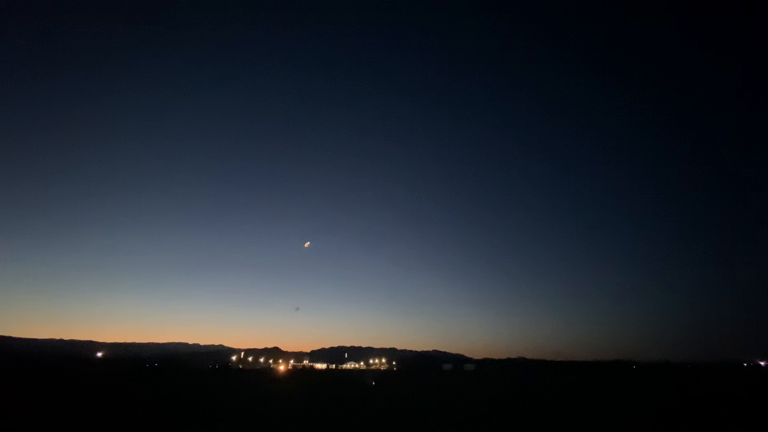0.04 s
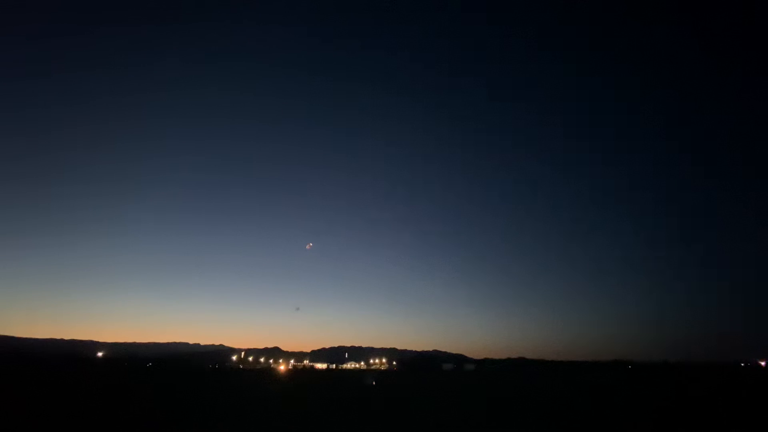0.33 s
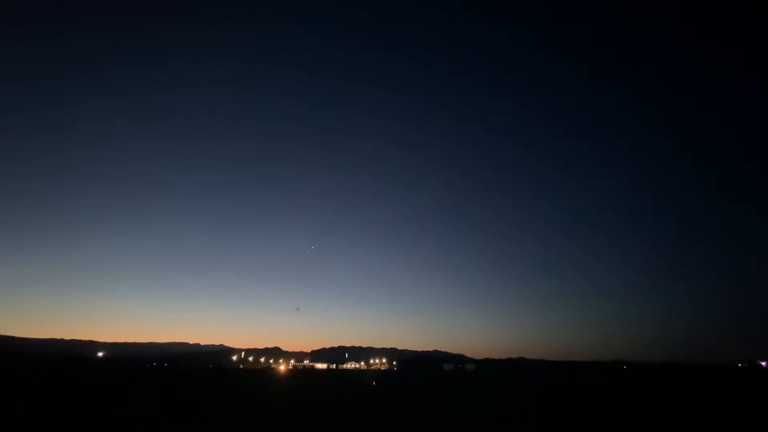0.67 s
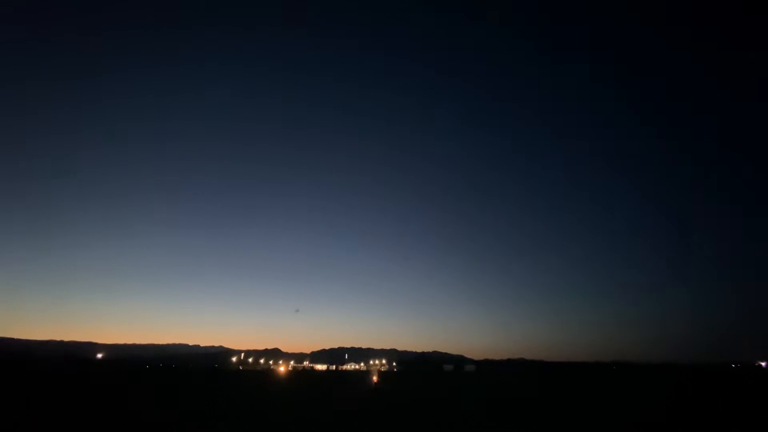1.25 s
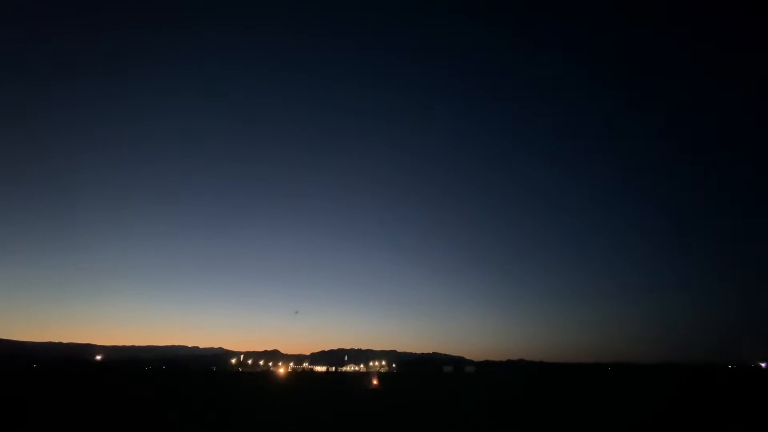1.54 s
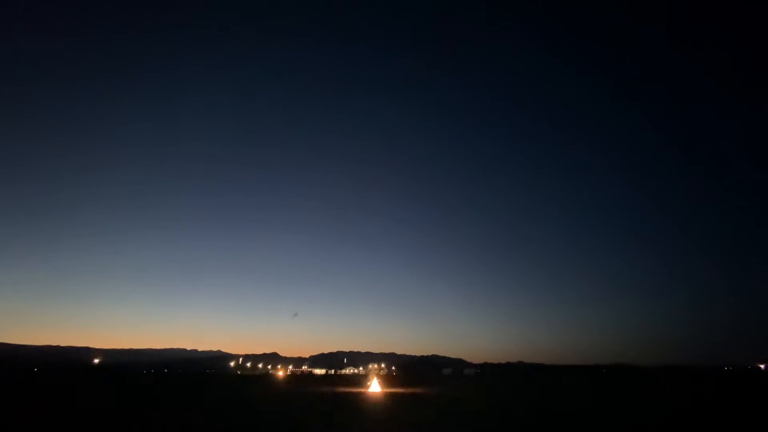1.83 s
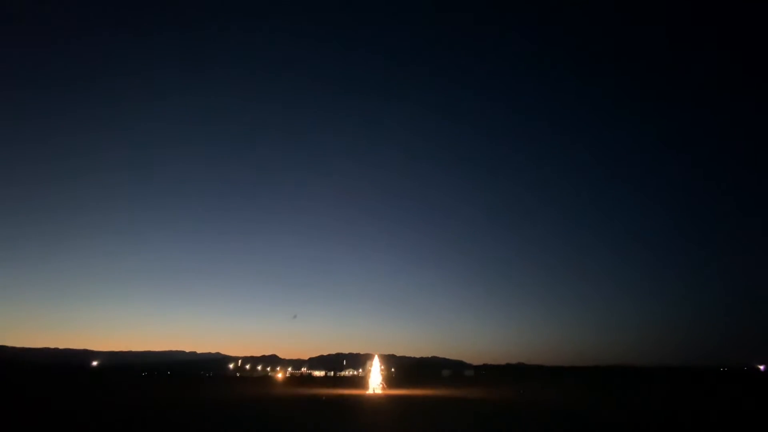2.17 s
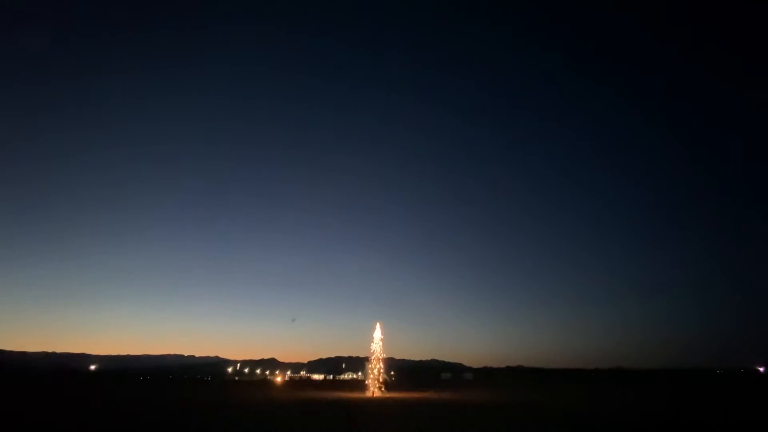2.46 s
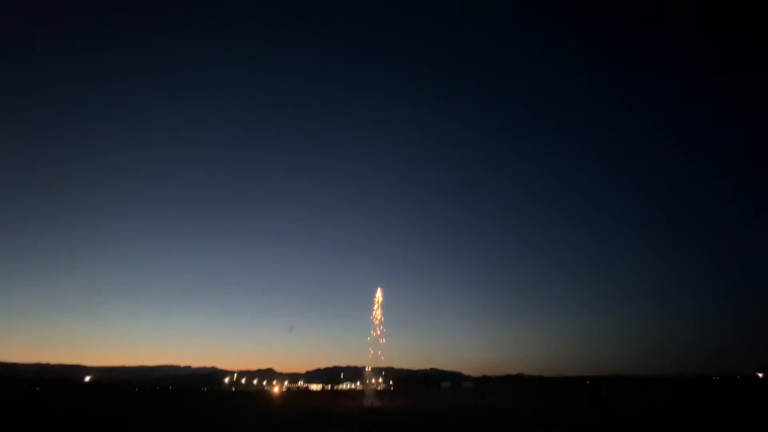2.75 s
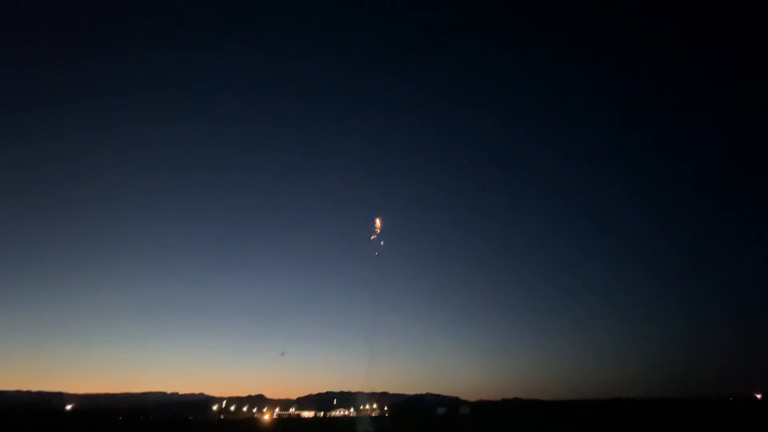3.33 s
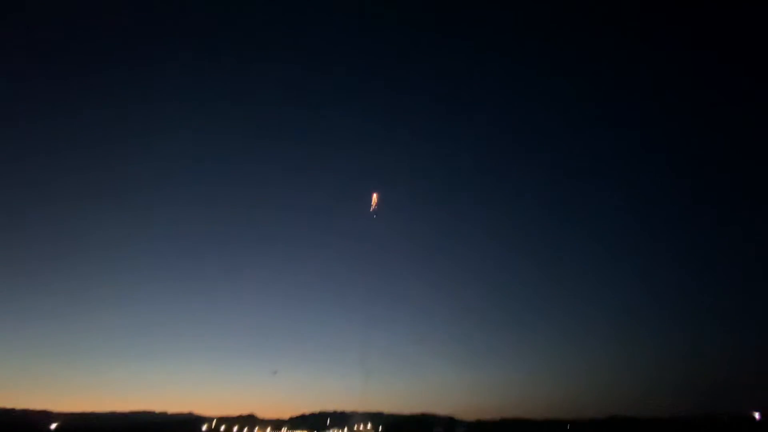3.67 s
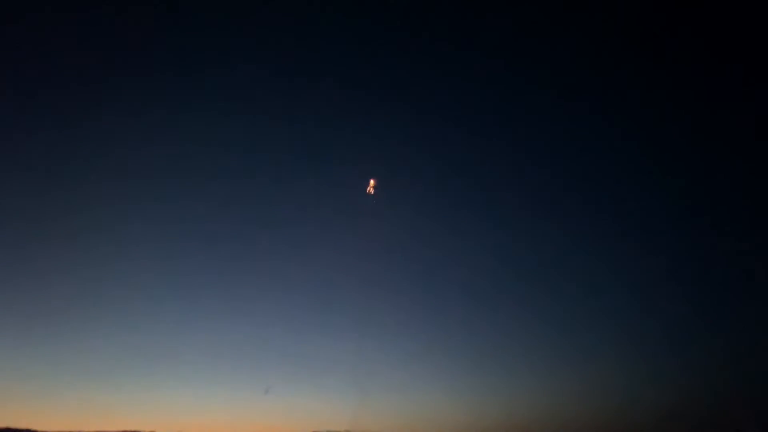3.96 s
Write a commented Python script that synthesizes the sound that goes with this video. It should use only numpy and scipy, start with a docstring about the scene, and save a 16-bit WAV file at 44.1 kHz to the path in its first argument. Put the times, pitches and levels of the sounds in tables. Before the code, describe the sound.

A whistling firework rocket launches outdoors at a distance from the microphone. Faint low air rumble comes first, then sharp pops and a brief fizz, then a high, raspy whistle with hiss, falling steadily in pitch.

```python
"""Whistling rocket at dusk

Open ground, a two-port stereo microphone in low rumbling air, the rocket some way off.
It catches with pops and a sputtering flare, whistles on its pin, then lifts off hissing, the pitch
falling as its pipe burns longer. Spin and wobble split the whistle into close lines; the ground
echo makes it swell as it climbs, and the land scatters a faint tail."""
import sys
import numpy as np
from scipy import signal
from scipy.fft import rfft, irfft
from scipy.io import wavfile
from scipy.ndimage import map_coordinates

SR = 44100
rng = np.random.default_rng(int(sys.argv[2]) if len(sys.argv) > 2 else 0)


def unload_wav(signal):
    """Save mono or channel-first audio to the path in sys.argv[1] as 16-bit WAV at rate SR, clipped to [-1, 1]."""
    wavfile.write(
        sys.argv[1],
        SR,
        np.round(np.clip(np.atleast_2d(signal).T, -1, 1) * 32767).astype(np.int16),
    )


N = 176400
T = np.arange(N) / SR
HZ = np.fft.rfftfreq(N, 1 / SR)


def amp(db):
    """Decibels to gain."""
    return 10 ** (np.asarray(db) / 20)


def unit_rms(x):
    """Scales to rms 1."""
    return x / np.sqrt(np.mean(x ** 2) + 1e-20)


def curve(rows, column=1):
    """One column of a time table, at every sample."""
    rows = np.array(rows, float)
    return np.interp(T, rows[:, 0], rows[:, column])


def spectrum(rows, hz=HZ):
    """Reads a frequency table along a log axis."""
    f, value = np.transpose(rows)
    return np.interp(np.log(hz + 1), np.log(f + 1), value)


def noise(colour):
    """Steady noise of a given spectrum, rms 1."""
    return unit_rms(irfft(rfft(rng.standard_normal(N)) * amp(spectrum(colour)), N))


def wander(hz):
    """Random drift up to about a given rate, rms 1."""
    return unit_rms(irfft(rfft(rng.standard_normal(N)) / (1 + (HZ / hz) ** 4), N))


def phase_of(hz):
    """Angle reached by a frequency curve."""
    return 2 * np.pi * np.cumsum(hz) / SR


def filtered(x, gain):
    """Applies a gain given on the HZ axis."""
    return irfft(rfft(x, 2 * N) * np.repeat(gain, 2, axis=-1)[..., :N + 1], 2 * N)[..., :N]


def pan(db):
    """Left and right gains of constant total power for a level difference."""
    pair = np.array([amp(db / 2), amp(-db / 2)])
    return pair / np.sqrt(np.mean(pair ** 2, axis=0))


# Rumble at the microphone: t/s, level/dB
AIR_LEVEL = [(.07, -50), (1.4, -47.5), (2.2, -59.5), (4.0, -68.5)]
# Its colour: f/Hz, relative level/dB
AIR_SPECTRUM = [(20, -61), (45, 0), (135, -4), (250, -14.5), (500, -21), (600, -37), (2700, -53),
                (4000, -54), (15000, -65)]


def air():
    """Low rumble of the open air, nearly alike left and right."""
    side = amp(-17.5) * noise(AIR_SPECTRUM)
    onset = np.clip((T - .068) / .0027, 0, 1)
    return (noise(AIR_SPECTRUM) + np.array([side, -side])) * amp(curve(AIR_LEVEL)) * onset


# Ignition pops: t/s, thump level/dB, crack level/dB, final f/Hz
IGNITION_POPS = [(.756, -54.5, -57, 110), (0.8792, -21, -31.5, 109), (0.981, -26, -36, 183.6),
                 (1.039, -32, -22, 300), (1.054, -15, -24, 112), (1.1267, -30, -48, 666),
                 (1.136, -24.5, -42, 670)]
POP_GLIDE_S, POP_DECAY_CYCLES, POP_RISE_S, CRACK_S = .00335, 3.27, .0012, .0022


def pops():
    """Each pop is a short crack and a thump that falls in pitch and dies within a few cycles."""
    out = np.zeros(N)
    t = np.arange(SR // 20) / SR
    rise = 1 - np.exp(-(t / POP_RISE_S) ** 2)
    for start_s, thump_db, crack_db, end_hz in IGNITION_POPS:
        angle = phase_of(end_hz + (1200 - end_hz) * np.exp(-t / POP_GLIDE_S))
        decay = np.exp(-(angle / (2 * np.pi * POP_DECAY_CYCLES)) ** 2)
        thump = unit_rms(np.sin(angle)) * rise * decay
        crack = rng.standard_normal(len(t)) * np.exp(-t / CRACK_S)
        at = round(start_s * SR)
        out[at:at + len(t)] += amp(thump_db) * thump + amp(crack_db) * crack
    return out


# Flare at the launch spot: t/s, body level/dB, relative fizz level/dB
FLARE_LEVELS = [(0.84, -66, -83), (0.875, -39, -47), (0.896, -57.5, -74), (0.966, -44, -60.5),
                (1.0, -40, -54), (1.044, -24, -26), (1.106, -44, -89), (1.134, -40, -59), (1.17, -53, -58)]
# Colours of body and fizz: f/Hz, relative level/dB
BODY_SPECTRUM = [(40, -11), (110, 2.5), (350, 1), (500, -9.5), (700, -2), (950, -4), (1200, -12.5),
                 (1600, -4.5), (3000, -57), (6000, -29.5)]
FIZZ_SPECTRUM = [(1200, -25), (2300, 4.5), (3100, -8.5), (4800, 11.5), (7500, 1), (10500, 0.5),
                 (14500, 2.5)]
FIZZ_BOOST_DB, SPUTTER_DB = 6, 3.5


def flare():
    """The fuse reaches the powder: a ragged puff with fizz on top."""
    gate = np.interp(T, [.85, .865, 1.13, 1.2], [0, 1, 1, 0])
    body = noise(BODY_SPECTRUM) * amp(curve(FLARE_LEVELS) + SPUTTER_DB * wander(80))
    fizz = noise(FIZZ_SPECTRUM) * amp(curve(FLARE_LEVELS, 2) + FIZZ_BOOST_DB + SPUTTER_DB * wander(170))
    fizz_fade = np.interp(T, [1.06, 1.09], [1, .3])
    return gate * (body + fizz * fizz_fade)


# The pipe's note, rising a little, then falling as it burns longer: t/s, f/Hz
PIPE_PITCH = [(1.06, 3365), (1.09, 3522), (1.28, 3569), (1.4, 3616), (1.45, 3557), (1.57, 3522),
              (1.71, 3452), (1.8, 3041), (1.9, 2895), (2.2, 2693), (2.6, 2491), (2.9, 2327), (3.4, 2207),
              (4.0, 2025)]
# Unsteady burning: t/s, pitch jitter/Hz, half-order lines against the overtones/dB
UNSTEADY_BURN = [(1.06, 13, -11.5), (1.33, 7, -0.5), (1.43, 31, -5.5), (1.63, 9, -2.5), (1.675, 94, -6),
                 (1.88, 22.2, -15.5), (2.3, 9.3, -30.5), (4.0, 6, -36)]
# Line spacing, an uneven beat on the pin, then the quickening spin: t/s, f/Hz
SPIN_RATE = [(1.06, 99.5), (1.3, 117.8), (1.44, 48.07), (1.95, 50.09), (2.4, 102), (2.7, 134),
             (3.05, 152.4)]
# Side lines against the centre line: t/s, lower gain, upper gain, overtones' lower gain, wobble depth
SIDE_LINES = [(1.3, 0.22, 2.7, 0.036, 0.016), (1.35, 0.2, 0.17, 0.34, 0.048), (1.65, 0.35, .3, 0.18, 0),
              (2.05, 2.35, 1.24, 1.47, 0.31), (2.45, 1.93, 1.2, 1.84, 0.29), (2.8, 0.89, 0.68, 2.5, 0.15),
              (3.03, 0.33, 0.44, 0.87, 1.107), (4.0, 0.19, .25, 0.57, 1.44)]
# Higher overtones dissolve into hiss on the climb: t/s, exponent of the overtone's number
RASP_EXPONENT = [(1.6, 1.0), (1.8, 1.7), (2.0, 1.5), (2.85, 1.7), (3.15, 2.2), (4.0, 2.2)]
# Colour of the overtones: f/Hz, relative level/dB
PIPE_SPECTRUM = [(4200, -3.5), (5600, 1), (6400, -4), (8800, -3.5), (10600, 1), (14500, 2.5)]
# Levels from some way off, first of the fundamental, then of the overtones: t/s, level/dB
TONE_LEVEL = [(1.05, -28), (1.09, -18), (1.12, -29), (1.45, -17.5), (1.65, -33.5), (1.7, -20),
              (1.84, -26.5), (1.98, -16.5), (2.5, -20.5), (4.0, -21.5)]
OVERTONE_LEVEL = [(1.15, -55.5), (1.23, -42), (1.7, -33.5), (1.775, -17.5), (1.83, -27.5), (2.85, -27.5),
                  (3.1, -32.5), (4.0, -38)]
BURN_START_S, ATTACK_S, JITTER_HZ = 1.058, .019, 132
WOBBLE_HZ, WOBBLE_SWING, SWING_GROWTH = 52.1, .5, .79
FLUTTER, FLUTTER_HZ, SKIRT_DB, SKIRT_HZ = .22, 15.6, -21, 178
FALL_DB_PER_ORDER, UPPER_TO_LOWER = 6, .2
BURN_ONSET = np.clip((T - BURN_START_S) / ATTACK_S, 0, 1)


def whistle():
    """The burning pipe's fundamental and overtones, split into beating lines by spin and wobble."""
    pitch = curve(PIPE_PITCH)
    phase = phase_of(pitch + curve(UNSTEADY_BURN) * wander(JITTER_HZ) + 4 * wander(11.7))
    spin = np.exp(1j * phase_of(curve(SPIN_RATE)))
    lower, upper, overtone_lower, depth = (curve(SIDE_LINES, column) for column in (1, 2, 3, 4))
    wobble = depth * np.cos(phase_of(WOBBLE_HZ + .5 * wander(2.4)))
    envelope = (1 + wobble) / np.sqrt(1 + depth ** 2 / 2) * BURN_ONSET

    def partial(k):
        """The line at k times the pitch, with its side lines and a skirt of noise."""
        below, above = (lower, upper) if k == 1 else (overtone_lower, UPPER_TO_LOWER * overtone_lower)
        split = (1 + below / spin + above * spin) / np.sqrt(1 + below ** 2 + above ** 2)
        angle = k * phase + k ** SWING_GROWTH * WOBBLE_SWING * wobble
        flutter = np.exp(FLUTTER * np.sqrt(k) * wander(FLUTTER_HZ))
        width_hz = SKIRT_HZ * k ** .58
        rasp = amp(SKIRT_DB) * k ** curve(RASP_EXPONENT)
        skirt = rasp * (wander(width_hz) + 1j * wander(width_hz))
        line = ((flutter + skirt) * np.exp(1j * angle) * split).real
        return unit_rms(line / np.sqrt(.5 + rasp ** 2)) * envelope * (k * pitch < BAND_EDGE_HZ)

    def weight(k):
        return amp(spectrum(PIPE_SPECTRUM, k * pitch) - FALL_DB_PER_ORDER * max(k, 2))

    orders = range(2, 8)
    overtones = sum(weight(k) * partial(k) for k in orders)
    half_orders = sum(weight(k) * partial(k) for k in (.5, 1.5, 2.5))
    overtones += amp(curve(UNSTEADY_BURN, 2)) * half_orders
    overtones /= np.sqrt(sum(weight(k) ** 2 for k in orders))
    return amp(curve(TONE_LEVEL)) * partial(1), amp(curve(OVERTONE_LEVEL)) * overtones


# Exhaust hiss: t/s, relative level/dB
JET_LEVEL = [(1.16, -81), (1.24, -59), (1.64, -52.5), (1.8, -40.5), (2.1, -45), (4.0, -57.5)]
# Pipe resonances in the hiss: multiple of the pitch, relative level/dB
JET_RESONANCES = [(.4, -4.5), (.55, 0), (.68, -2.5), (.88, 10), (1, -8), (1.15, -3), (1.3, -1.5),
                  (1.5, 11.5), (1.72, -2), (1.95, 9), (2.22, 0), (2.5, 5), (3, 8.5), (3.25, -5), (3.5, 8)]
# Steady colour of the hiss: f/Hz, relative level/dB
JET_SPECTRUM = [(200, -7.5), (520, -9), (800, 5.5), (1180, -2), (1500, 5), (2300, -1.5), (3100, -4),
                (4100, 4.5), (7000, -8), (10500, -5), (15000, -21)]
JET_BOOST_DB = 10


def jet():
    """Sputtering exhaust hiss, coloured by resonances that slide with the pipe's pitch."""
    pitch = curve(PIPE_PITCH)
    resonant = noise(np.array(JET_RESONANCES) * [pitch.max(), 1])
    sliding = map_coordinates(resonant, [np.cumsum(pitch / pitch.max())], order=3)
    hiss = unit_rms(filtered(sliding, amp(spectrum(JET_SPECTRUM))))
    sputter_db = 1.5 * wander(135) + 1.13 * wander(11.4)
    return hiss * amp(curve(JET_LEVEL) + JET_BOOST_DB + sputter_db) * BURN_ONSET


# The bounce arrives behind the direct sound: t/s, lag/cycles of the whistle
BOUNCE_LAG = [(1.95, 1), (2.43, 3), (2.6, 4), (3.055, 7), (3.4, 9), (3.6, 10), (4.0, 11.5)]
BOUNCE_LEFT, BOUNCE_RIGHT = .52, .38


def ground_bounce(x):
    """Adds an echo that lags more as the rocket rises; the whistle swells at each whole cycle of lag."""
    lag_s = curve(BOUNCE_LAG) / curve(PIPE_PITCH)
    echo = map_coordinates(x, [(T - lag_s) * SR], order=3) * np.interp(T, [1.9, 2.3], [0, 1])
    return np.array([x + BOUNCE_LEFT * echo, x + BOUNCE_RIGHT * echo])


RUSH_PEAK_S, RUSH_SPREAD_S, RUSH_HZ, RUSH_HALF_WIDTH_HZ, RUSH_DB = 2.333, .1, 1510, 194, -39


def rush():
    """A brief hollow rush of exhaust as the rocket gathers speed."""
    passband = 1 / (1 + ((HZ - RUSH_HZ) / RUSH_HALF_WIDTH_HZ) ** 4)
    band = unit_rms(filtered(rng.standard_normal(N), passband))
    return band * amp(RUSH_DB) * np.exp(-((T - RUSH_PEAK_S) / RUSH_SPREAD_S) ** 2)


# Decay over open ground: f/Hz, time to fall 60 dB/s
LAND_DECAY = [(200, 0.51), (2500, 0.76), (8000, 0.32), (15000, 0.034)]
SCATTER_DB, SCATTER_LOW_CUT_HZ = -10.5, 1200


def land_scatter(x):
    """Faint scatter from the surrounding land, thin in the bass and different on each side."""
    thinned = filtered(x, HZ / (HZ + SCATTER_LOW_CUT_HZ))
    hz, t, bands = signal.stft(rng.standard_normal((2, SR)), SR, nperseg=256)
    decay = amp(-60 * t / spectrum(LAND_DECAY, hz)[:, None])
    tail = signal.istft(bands * decay, SR, nperseg=256)[1]
    tail /= np.linalg.norm(tail[0])
    return amp(SCATTER_DB) * signal.fftconvolve(thinned, tail, axes=1)[:, :N]


# Lean of the fundamental at the microphone: t/s, left minus right/dB
TONE_PAN = [(1.07, 9.5), (1.63, 9), (1.99, -10), (2.27, 2), (2.35, -14), (2.41, -3), (3.29, -0.5),
            (3.31, -2.5), (4.0, 4)]
# Lean of the rocket's other sounds: f/Hz, left minus right/dB
REST_PAN = [(350, 1), (700, 2), (1300, 2.5), (2400, 0.5), (4400, 5), (8000, -0.5)]
# Phase between the two ports: f/Hz, left minus right/rad
PORT_PHASE = [(0, 0), (300, 0), (1000, -.45), (2000, -.6), (2500, -1.5), (3100, -2.4), (3900, -2.6),
              (4800, -1.4), (6000, -1.6), (15000, -1.2)]


def scene():
    """The distant rocket, the land and the air, as they reach the microphone's two ports."""
    tone, overtones = whistle()
    rest = ground_bounce(overtones + jet()) + rush() + flare() + pops()
    rocket = ground_bounce(tone) * pan(curve(TONE_PAN)) + filtered(rest, pan(spectrum(REST_PAN)))
    port_shift = np.exp(np.array([[.5j], [-.5j]]) * spectrum(PORT_PHASE))
    rocket = filtered(rocket, port_shift)
    return rocket + land_scatter(rocket) + air()


NOTCH_HZ, NOTCH_WIDTH_HZ, NOTCH_DB, BAND_EDGE_HZ = 12085, 570, -24.5, 15850


def record(dry):
    """The microphone's treble notch, then its band limit."""
    notch = amp(NOTCH_DB * np.exp(-((HZ - NOTCH_HZ) / NOTCH_WIDTH_HZ) ** 2))
    lowpass = signal.firwin(511, BAND_EDGE_HZ, window=("kaiser", 9), fs=SR)
    return signal.oaconvolve(filtered(dry, notch), lowpass[None], "same")


dry = scene()
out = record(dry)
unload_wav(out)
```